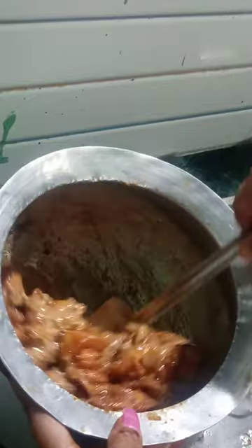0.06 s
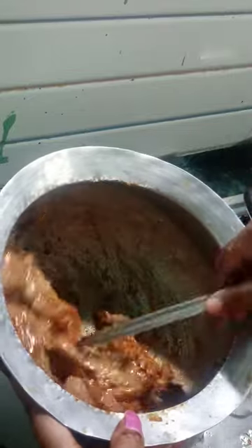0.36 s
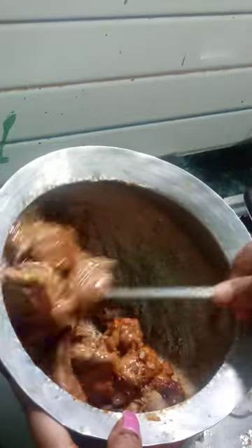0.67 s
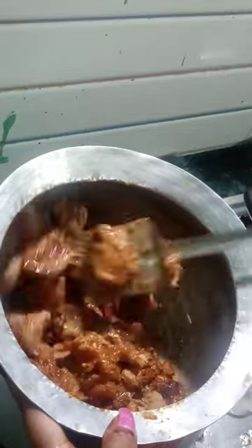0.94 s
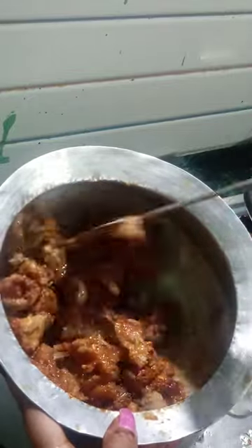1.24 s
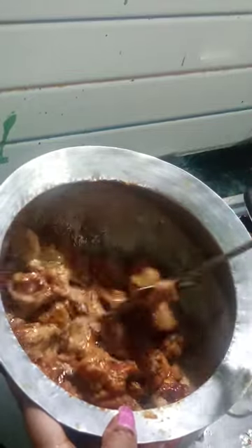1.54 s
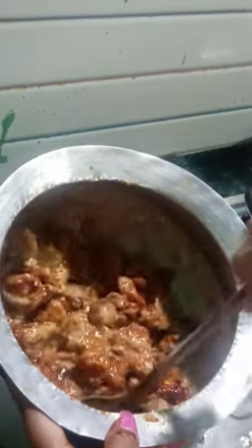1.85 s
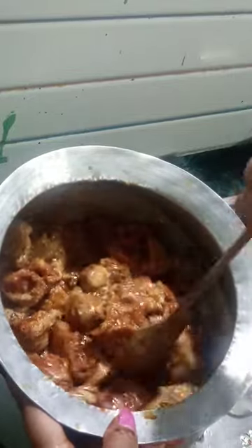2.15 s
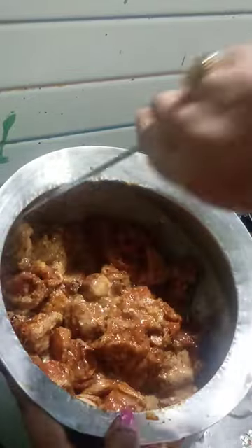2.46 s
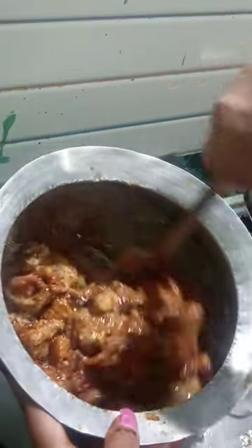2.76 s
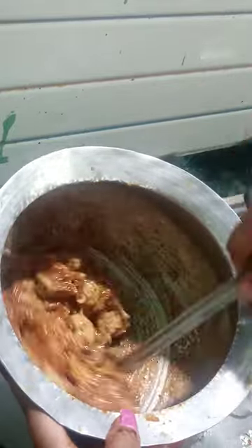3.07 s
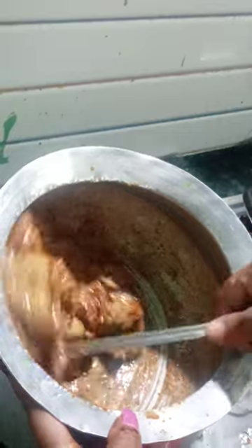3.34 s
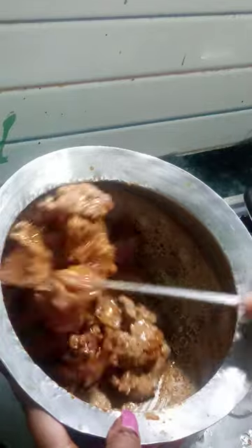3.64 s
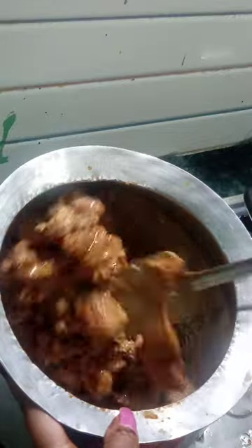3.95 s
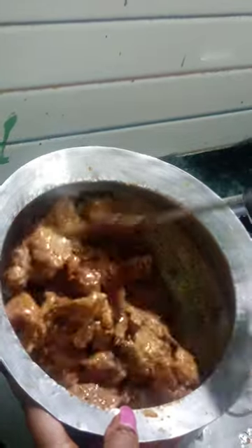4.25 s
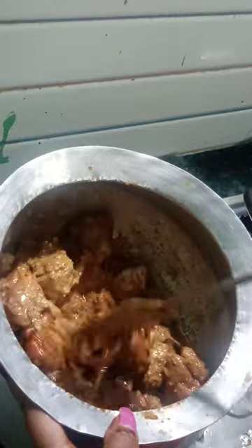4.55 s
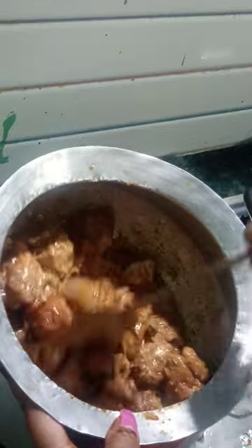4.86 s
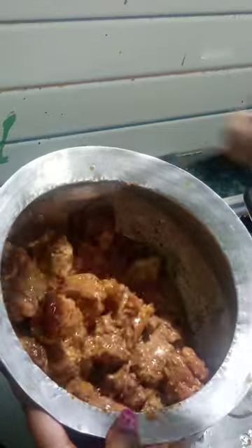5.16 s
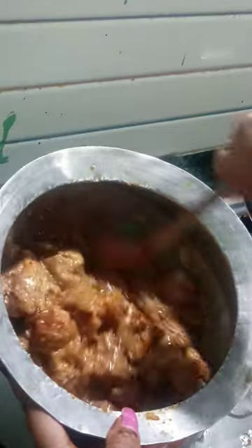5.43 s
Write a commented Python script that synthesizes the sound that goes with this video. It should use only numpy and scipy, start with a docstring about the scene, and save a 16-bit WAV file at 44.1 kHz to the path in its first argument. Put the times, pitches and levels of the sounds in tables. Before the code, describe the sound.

A steel spoon stirs chicken and thick paste in a metal pot, close by in a small kitchen. It opens with quick knocks and a juddering scrape, squeals briefly, then clanks twice. A longer rasping stroke follows with wet crackling. After a quieter stretch of soft thuds, clicks and tinkling bangles, sharp clanks and another scrape finish. A low hum and a faint high shrill continue behind.

```python
"""A steel spoon stirs raw chicken and thick paste in a hand-held metal pot, close by in a small kitchen.
It knocks on the wall, judders and rasps along the bottom as it sticks and slips, and squeals once.
The food damps the pot's ring and crackles; food and spoon also make soft thuds and short, bright clicks.
Small metal, probably bangles on the stirring arm, tinkles. Behind it are a low hum and a high shrill."""
import sys
import numpy as np
from scipy import signal
from scipy.fft import rfft, irfft, next_fast_len
from scipy.io import wavfile
from scipy.ndimage import map_coordinates

SR = 44100
rng = np.random.default_rng(int(sys.argv[2]) if len(sys.argv) > 2 else 0)


def output_pcm(signal):
    """Save a mono or channel-first signal as 16-bit PCM at the path in sys.argv[1].

    Samples are clipped to [-1, 1] before scaling.
    """
    pcm = np.clip(np.atleast_2d(signal).T, -1, 1) * 32767
    wavfile.write(sys.argv[1], SR, np.round(pcm).astype(np.int16))


N = 246959
TIME = np.arange(N) / SR  # seconds since the scene began
AGE = np.arange(SR // 2) / SR  # seconds since a short sound began

# Levels are relative. A fade time (t60) is how long a sound takes to drop by 60 dB.
# The tone of five noises. Each row: frequency in Hz, level in dB.
ROOM_TONE = [(20, -31), (50, -5.5), (90, 4.5), (150, 0), (240, -2), (340, .5), (480, 0.5), (700, -7.5),
             (1000, -7), (1500, -12), (3000, -12.5), (5500, -24.5), (10000, -27), (15500, -31)]
SHRILL_TONE = [(6700, -34.5), (7450, -12), (7900, -3), (8250, 0), (8400, -3.5), (8580, -13.5), (9100, -36)]
JUDDER_TONE = [(40, -45), (100, -23.5), (170, -15), (230, -18.5), (300, -8), (420, -2.5), (520, -3.5),
               (630, -1.5), (750, -6.5), (1000, -6), (1500, -31.5)]
RASP_TONE = [(500, -41.5), (800, 2.5), (1200, -4.5), (2000, -1), (3400, 2), (4500, -7), (6000, -13.5),
             (9000, -39.5)]
HISS_TONE = [(3500, -36), (5200, -9.5), (6500, -2.5), (7600, 3), (9000, -3), (11000, -15), (15000, -11.5)]
# The meat turns over. Each row: time of the peak in seconds, level in dB, fade time in seconds.
MEAT_TURNS = [(.05, -40, 3), (2.82, -34, 2), (4.45, -45.5, 0.1854), (4.82, -48, 0.0031), (5.55, -39.5, 2)]
# Soft thuds in the pot. Each row: start in seconds, thud in dB, slap in dB, fade time in seconds.
SOFT_THUDS = [(0.546, -47.5, -48, 0.0815), (1.204, -50, -64, 0.0567), (1.348, -52, -46, 0.1821),
              (2.323, -67, -53.5, 0.07714), (3.893, -47, -46.5, 0.1904), (3.923, -46.5, -51.5, 0.5117),
              (4.295, -55, -49, 0.1213), (4.449, -59.5, -52, 0.307), (4.726, -51, -59.5, 0.03996),
              (4.749, -58.5, -48, 0.25), (5.044, -53.5, -45.5, 0.04)]
# Short, bright clicks. Each row: start in seconds, pitch in Hz, note in dB, snap in dB.
BRIGHT_CLICKS = [(.484, 2875, -57.5, -47.5), (0.617, 1119, -60, -71.5), (0.669, 1706, -56.5, -62.5),
                 (0.819, 4070, -47, -36.5), (.941, 3408, -55.5, -56), (.971, 6825, -58, -59),
                 (1.014, 3232, -42.5, -49.5), (1.404, 3379, -60, -58), (1.485, 3586, -51.5, -64.5),
                 (1.543, 2595, -57, -57), (1.553, 3340, -51, -59), (1.753, 4550, -63, -51.5),
                 (3.434, 1201, -47, -43.5), (3.727, 1960, -53, -56), (3.893, 3300, -52, -51),
                 (4.046, 6960, -60.5, -58), (4.252, 3900, -64, -58), (4.569, 1767, -50.5, -67.5),
                 (4.704, 4692, -57.5, -66.5), (4.782, 3704, -69, -48.5), (4.797, 2037, -50.5, -51),
                 (5.206, 6085, -47.5, -45)]
# The bangles' notes. Each row: pitch in Hz, level in dB, fade time in seconds.
BANGLE_NOTES = [(5896.3, -15.5, 0.268), (7555.3, 1, 0.25655), (7492, 2, 0.1341), (10923, -3.5, .23),
                (13831, -1, 0.1024), (14372, 3.5, 0.22)]
# The bangles touch. Each row: start in seconds, tick in dB, ring in dB.
BANGLE_TOUCHES = [(1.254, -61, -46), (1.298, -60, -55), (1.603, -61, -59), (1.879, -54, -49),
                  (2.352, -72.5, -57), (2.455, -44.5, -36), (2.647, -54, -39.5), (4.291, -37.5, -37),
                  (4.303, -43, -44.5), (4.820, -35, -38.5), (5.234, -26.5, -36)]
# The notes of the full pot. Each row: pitch in Hz, width in Hz (wider dies sooner), level in dB.
POT_NOTES = [(276.35, 31.91, -12.5), (397.32, 8.035, -9), (479.22, 16.01, -9.5), (517.44, 16.217, 6.5),
             (604.86, 7.06, -10), (1012.8, 3.998, -12), (1074.7, 19.794, 0), (1314.7, 11.3, -12),
             (1660, 28, -1.5), (1925.1, 79.05, -9.5), (2274.2, 14.76, -11), (2455.5, 33.58, -2.5),
             (2603.6, 23.86, -6), (2790.6, 18.45, -10.5), (3181, 38.2, -15.5), (3436.3, 45, -6.5),
             (3691.1, 86.4, -11), (3918.8, 41.3, -7.5), (4322.6, 107.9, -12.5), (4672.1, 26.75, -16),
             (5014.2, 26.63, -17.5), (5622, 12.86, -24), (6225.3, 19.56, -14), (6494.3, 29.6, -8.5),
             (7005, 104.4, -10), (7130, 45, -37), (7514.7, 26.63, 0), (8510.6, 33.5, -7.5)]
# The course of the squeal. Each row: time in seconds, pitch in Hz, level in dB.
SQUEAL_PATH = [(.762, 771.7, -63.5), (.785, 805, -44.5), (0.835, 866, -40.5), (.848, 883.8, -54.5),
               (.93, 848.9, -59)]
# The spoon's path, a list per stroke. Each row: time in seconds, force in dB, depth (0 wall, 1 bottom).
STROKE_PATHS = [
    [(0, -30.5, 0.621), (.07, -34.5, 0.4995), (.14, -33.5, .3), (.21, -35, 0.5127), (.28, -39, 0.8879),
     (.35, -49.5, 0.9669), (.39, -39.5, .74), (.45, -48, 0.7846), (.53, -48.5, 0.6446),
     (.75, -62.5, 0.4956)],
    [(1.95, -41.5, 0.9165), (1.98, -45.5, 0.8782), (2.026, -37.5, .92), (2.11, -53.5, 0.8778),
     (2.2, -53, 0.6937)],
    [(2.6, -43.5, 0.3639), (2.68, -42, .4), (2.71, -35, 0.39324), (2.86, -33, 0.48416),
     (2.96, -29.5, 0.62716), (3.05, -38, .93), (3.19, -39, 0.8514), (3.26, -37.5, 0.92193),
     (3.36, -39, 0.9745), (3.41, -45.5, 0.85545), (3.45, -38.5, .78), (3.52, -43, .3), (3.63, -41, .13),
     (3.85, -61.5, 0.22842)],
    [(5.35, -41, .45), (5.39, -36.5, 0.10093), (5.41, -33.5, .08), (5.465, -27.5, 0.11674),
     (5.52, -36.5, .38), (5.6, -37.5, 0.5144)],
]
# How the coat of paste changes each stroke. Each row: judder in dB, hiss in dB, both added to the force.
PASTE_COATING = [(6, -9), (0, -13), (.5, -1.5), (1, -2.5)]
# The spoon hits the pot. Each row: start in seconds, level in dB, hardness (0 padded by meat,
# 1 bare metal), extra treble of an edge-on blow in dB, rebound from 0 to 1.
SPOON_KNOCKS = [(0.038, -23, 0.6834, 0, 0.77), (0.159, -22.5, .65, -2, 0.81), (0.24, -23.5, .05, 0, 0.47),
                (0.362, -25, 0, -4, 0.32), (0.382, -22.5, .2, 0, 0.49), (1.892, -11.5, .4, -1.5, 0.43),
                (2.512, -11.5, 1, -2, .67), (2.697, -27, 0.6568, 0, 0.41), (2.953, -16, .5, 2, 0.39),
                (3.124, -24.5, 0.05352, -3, .3), (3.354, -24, 0, -2, 0.56), (3.385, -29, 0.7343, 1, 0.53),
                (5.230, -13, 1, 0, 0.52), (5.296, -17.5, .82, 7.5, 0)]
# The tone of a knock's noisy clash. Each row: frequency in Hz, level in dB.
CLASH_TONE = [(100, -43), (260, -2.5), (520, -2.5), (750, -1.5), (1500, 0.5), (3000, -4), (5000, -10.5),
              (7500, 2.5), (9500, -11.5), (12000, -19), (15000, -13.5)]
# The bands of a knock. Each row: low edge in Hz, high edge in Hz, level in dB when padded, and when bare.
KNOCK_BANDS = [(199.57, 376.13, -22, -22), (378.32, 810.6, 0, -16), (800.6, 1400, -4.5, -12.5),
               (1400, 2200, -12, -12), (2195.4, 5062, -20.5, -.5), (5122, 15610, -17, -1)]

TOP_HZ = 15850  # the highest frequency heard


def amp(db):
    """Turn decibels into a gain."""
    return 10 ** (np.asarray(db) / 20)


def unit(x):
    """Scale a sound to an average strength (rms) of 1."""
    return x / np.sqrt(np.mean(x ** 2) + 1e-20)


def struck(x):
    """Scale a hit so that its first 20 ms have an average strength of 1."""
    return x / np.sqrt(np.mean(x[:SR // 50] ** 2) + 1e-20)


def fade(t60):
    """A fade of 60 dB in t60 seconds."""
    return np.exp(-np.log(1000) * AGE / t60)


def add(track, start_s, x):
    """Mix x into the track at the given time."""
    start = max(round(start_s * SR), 0)
    track[start:start + len(x)] += x[:N - start]


def wobble(rate):
    """A smooth random curve through rate points a second."""
    points = rng.standard_normal(int(N * rate / SR) + 4)
    at = np.arange(0, len(points) - 1, .125)
    return np.interp(TIME * rate, at, map_coordinates(points, [at]))


def swell(peak_s, before_s, after_s):
    """A ramp from 0 up to 1 and back."""
    return np.interp(TIME, [peak_s - before_s, peak_s, peak_s + after_s], [0, 1, 0])


def filtered(x, response):
    """Scale each frequency in x by response(hz)."""
    size = next_fast_len(len(x) + SR // 4)
    return irfft(rfft(x, size) * response(np.fft.rfftfreq(size, 1 / SR)), size)[:len(x)]


def colour(x, tone):
    """Shape x with a tone table."""
    hz, db = np.transpose(tone)
    return filtered(x, lambda f: amp(np.interp(np.log(f + 1), np.log(hz), db)))


def band(x, lo_hz, hi_hz):
    """Keep what lies between two frequencies."""
    edges = [lo_hz, min(hi_hz, SR / 2 - 1)]
    return signal.sosfilt(signal.butter(3, edges, "band", fs=SR, output="sos"), x)


def burst(t60, tail_db, tail_t60):
    """A puff of noise, with a tail from the pot's hollow and the walls."""
    return rng.standard_normal(len(AGE)) * (fade(t60) + amp(tail_db) * fade(tail_t60))


def grains(rate, spread_db):
    """Tiny clicks of uneven size at random times, about rate a second."""
    clicks = (rng.random(N) < rate / SR) * rng.standard_normal(N)
    return clicks * amp(spread_db * np.clip(rng.standard_normal(N), -2, 2))


def bubbles(rate, hz, cycles, spread_db):
    """Tiny pops, each a fading note of its own pitch, a few cycles long."""
    count = int(rate * N / SR)
    pitch, size = np.clip(rng.standard_normal((count, 2)), -2, 2).T
    turns = np.minimum(hz * np.exp(.6 * pitch), SR / 3)[:, None] * AGE[:300]
    pops = amp(spread_db * size)[:, None] * np.sin(2 * np.pi * turns) * np.exp(-turns / cycles)
    where = rng.integers(0, N, (count, 1)) + np.arange(turns.shape[1])
    return unit(np.bincount(where.ravel(), pops.ravel(), N)[:N])


def fuzzy_note(hz, width_hz):
    """A narrow band of noise around a steady or moving pitch."""
    phase = 2 * np.pi * np.cumsum(hz * np.ones(N)) / SR
    return unit(wobble(width_hz) * np.sin(phase) + wobble(width_hz) * np.cos(phase))


def kitchen_echo(x, wet_db, t60):
    """Close, hard walls add a short wash of echo."""
    tail = rng.standard_normal(len(AGE)) * fade(t60) * (AGE > .002)
    return x + amp(wet_db) * signal.fftconvolve(x, tail / np.linalg.norm(tail))[:N]


def through_pot(x, direct):
    """The pot rings along with x; a share of x is also heard directly."""
    return filtered(x, lambda f: direct + sum(
        amp(db) * 1j * f * width / (hz * hz - f * f + 1j * f * width) for hz, width, db in POT_NOTES))


def shifting_ring(x, direct, shift_db):
    """As the spoon travels, each of the pot's notes rings now more, now less."""
    notes = (amp(db + shift_db * wobble(10)) * signal.lfilter(*signal.iirpeak(hz, hz / width, fs=SR), x)
             for hz, width, db in POT_NOTES)
    return direct * x + sum(notes)


def background():
    """Room noise, a low hum that swells once, and a high shrill (perhaps insects) that dips once."""
    room = amp(-57) * unit(colour(rng.standard_normal(N), ROOM_TONE)) * amp(0.1377 * wobble(4.7672))
    hum_db = -72 + 19.5 * swell(peak_s=3.937, before_s=0.15, after_s=0.8256)
    hum = amp(hum_db) * fuzzy_note(92, width_hz=20)
    drone = amp(-73.5) * fuzzy_note(198, width_hz=18) + amp(-65) * fuzzy_note(338, width_hz=18)
    shrill_db = -51.5 - 14 * swell(peak_s=4.13, before_s=0.18575, after_s=0.0525)
    shrill = unit(colour(rng.standard_normal(N), SHRILL_TONE))
    flicker_db = 1.83 * wobble(23) + 1.605 * wobble(120)
    return room + hum + drone + shrill * amp(shrill_db + flicker_db)


def crackle():
    """Films of paste tear as the meat turns over; wet surfaces part with faint ticks all the time."""
    rise_db_per_s = 104.5
    turns_db = [db - np.maximum(rise_db_per_s * (peak_s - TIME), 60 * (TIME - peak_s) / t60)
                for peak_s, db, t60 in MEAT_TURNS]
    fine = bubbles(rate=160, hz=7997, cycles=1.244, spread_db=4.5)
    squelch = bubbles(rate=240, hz=1824.8, cycles=2.393, spread_db=6.5)
    ticks = kitchen_echo(grains(rate=12, spread_db=.5), wet_db=-3, t60=.05)
    tearing = unit(kitchen_echo(amp(-4) * fine + squelch, wet_db=6, t60=0.2436))
    return amp(np.max(turns_db, axis=0) - 5) * tearing + amp(-71.5) * unit(band(ticks, 9500, 15500))


def soft_thuds():
    """Soft, dull thuds in the pot: meat landing, or a light touch of the spoon."""
    out = np.zeros(N)
    for start, thud_db, slap_db, t60 in SOFT_THUDS:
        bump = through_pot(burst(t60, tail_db=-10, tail_t60=0.2913), direct=0.99)
        thud = band(bump, 102.17, 585.9)
        slap = band(bump, 848.7, 1682.1) + amp(-11) * band(bump, 2000, 4163.3)
        add(out, start, amp(thud_db) * struck(thud) + amp(slap_db) * struck(slap))
    return out


def bright_clicks():
    """Short, bright clicks: wet pops of air in the paste, and one sharp tick of the spoon on a bangle."""
    out = np.zeros(N)
    for start, hz, note_db, snap_db in BRIGHT_CLICKS:
        note = band(burst(t60=.025, tail_db=-12, tail_t60=.14), hz * .89, hz * 1.12)
        puff = burst(t60=0.0213, tail_db=-4.5, tail_t60=0.1353)
        # the highest part of the snap is softer
        snap = band(puff, 3110.8, 9300) + amp(-7.5) * band(puff, 9282, 14337)
        add(out, start, amp(note_db) * struck(note) + amp(snap_db) * struck(snap))
    return out


def bangles():
    """Bangles touch with a bright tick, then ring with a few thin, wavering notes."""
    out = np.zeros(N)
    for start, tick_db, ring_db in BANGLE_TOUCHES:
        upper_db = 0.4247 * (tick_db + 40.5)  # a sharper tick wakes the upper notes more
        ring = np.zeros(len(AGE))
        for hz, db, t60 in BANGLE_NOTES:
            gain = amp(db + ring_db + upper_db * (hz > 9000) + rng.normal(0, 0.8986))
            drift = np.cumsum(rng.normal(0, 0.09517, len(AGE)))
            ring += gain * fade(t60) * np.sin(2 * np.pi * hz * AGE + drift)
        tick = struck(band(burst(t60=0.0602, tail_db=-11, tail_t60=0.2124), 5029.5, TOP_HZ))
        onset = 1 - np.exp(-AGE / 0.001009)
        add(out, start, amp(1.5) * ring * onset + amp(tick_db) * tick)
    return out


def squeal():
    """For a moment the spoon's slips fall into step and make a pitch."""
    times, hz, db = np.transpose(SQUEAL_PATH)
    pitch = np.interp(TIME, times, hz) * (1 + 0.00715 * wobble(118.39))
    phase = 2 * np.pi * np.cumsum(pitch) / SR
    harmonics_db = [6.5, -11, -11, -20.5, -24.5]
    tone = sum(amp(level) * np.sin(k * phase) for k, level in enumerate(harmonics_db, 1))
    level_db = np.interp(TIME, times, db, left=-150, right=-150)
    return unit(tone) * amp(level_db + 2.994 * wobble(74.084))


def bottom_judder(depth):
    """Coarse slips boom in the pot, more strongly as the spoon goes down."""
    slips = grains(rate=770, spread_db=1.5)
    boom = unit(colour(through_pot(slips, direct=0.2701), JUDDER_TONE))
    bottom_hz = 522 - 80 * depth ** 10  # the note sags when the spoon presses on the very middle
    return (boom + amp(.5) * fuzzy_note(bottom_hz, width_hz=120)) * amp(-18.5 + 21 * depth)


def rasp_and_hiss(depth, force_db):
    """Fine slips ring the pot, while spice grains and paste chirp under the spoon's edge."""
    grit = kitchen_echo(grains(rate=2000, spread_db=1.5), wet_db=-2.5, t60=0.13134)
    ringing = unit(shifting_ring(grit, direct=0.29016, shift_db=4))
    coarse = bubbles(rate=920, hz=1713.4, cycles=7.17, spread_db=3.5)
    fine = bubbles(rate=900, hz=8000, cycles=7, spread_db=3.5)
    rasp = unit(colour(ringing + amp(-8.5) * coarse, RASP_TONE))
    low = filtered(rasp, lambda hz: 1 / (1 + (hz / 1500) ** 6))
    rasp = rasp - low + amp(-8 + 13 * depth) * low  # the low notes come in on the way down
    push_db = force_db + 35.5  # pushing harder than usual makes the hiss louder and brighter
    hiss = unit(colour(ringing + amp(-2.5) * fine, HISS_TONE))
    sizzle = band(fuzzy_note(7600 + 65 * push_db, width_hz=1300), 4840, 10938)
    return rasp, (hiss + amp(-4.5) * sizzle) * amp(.25 * push_db - 3.5)


def edge_ring(depth):
    """The rubbing edge rings lower and more weakly as the spoon goes down."""
    wall_hz, bottom_hz = 3900, 1000
    note = amp(1 - 2 * depth) * fuzzy_note(wall_hz * (bottom_hz / wall_hz) ** depth, width_hz=1200)
    return band(note * amp(3 * wobble(90)), 550, 7000)


def scraping():
    """The spoon sticks and slips along the metal; its force and depth shape each stroke."""
    touch_s, lift_s = 0.01824, 0.0874
    times, forces, depths = np.transpose(np.concatenate(STROKE_PATHS))
    force_db = np.interp(TIME, times, forces)
    depth = np.interp(TIME, times, depths)
    judder = bottom_judder(depth)
    rasp, hiss = rasp_and_hiss(depth, force_db)
    edge = edge_ring(depth)
    catching = amp(1.6 * wobble(55))
    out = np.zeros(N)
    for path, (judder_db, hiss_db) in zip(STROKE_PATHS, PASTE_COATING):
        start, end = path[0][0], path[-1][0]
        contact = np.interp(TIME, [start - touch_s, start, end, end + lift_s], [0, 1, 1, 0])
        friction = amp(-6.6) * (rasp + edge) + amp(hiss_db) * hiss
        out += contact * (amp(judder_db) * judder + catching * friction)
    return amp(force_db) * out


def knocks():
    """Each blow of the spoon rings the pot a new way, brighter and a little longer on bare metal."""
    padded_t60, bare_t60, treble_hz = 0.19115, 0.23138, 4000
    bounce = np.exp(-((AGE - .004) / 0.001782) ** 2)  # the spoon lands again after 4 ms
    out = np.zeros(N)
    for start, level_db, hardness, treble_db, rebound in SPOON_KNOCKS:
        ring = np.zeros(len(AGE))
        for hz, width, db in POT_NOTES:
            strength = amp(db + rng.normal(0, 4.2095)) * np.exp(-np.pi * width * .45 * AGE)
            ring += strength * np.sin(2 * np.pi * (hz * AGE + rng.random()))
        t60 = np.interp(hardness, [0, 1], [padded_t60, bare_t60])
        clash = unit(colour(rng.standard_normal(len(AGE)), CLASH_TONE))
        clash *= fade(0.04434) + amp(6) * fade(t60)
        blow = (amp(-1.5) * struck(clash) + struck(ring * fade(.38))) * (1 + rebound * bounce)
        for lo_hz, hi_hz, padded_db, bare_db in KNOCK_BANDS:
            band_db = np.interp(hardness, [0, 1], [padded_db, bare_db]) + treble_db * (lo_hz > treble_hz)
            add(out, start, amp(level_db + band_db - 7) * struck(band(blow, lo_hz, hi_hz)))
    return out


def scene():
    """Everything in and around the pot, in one channel."""
    spoon = knocks() + scraping() + squeal()
    return (spoon + bangles() + bright_clicks() + soft_thuds() + crackle() + background())[None]


def record(dry):
    """Thin the deep bass and cut everything above TOP_HZ."""
    return np.array([filtered(x, lambda hz: (hz < TOP_HZ) * hz ** 2 / (hz ** 2 + 34 ** 2)) for x in dry])


dry = scene()
out = record(dry)
output_pcm(out)
```